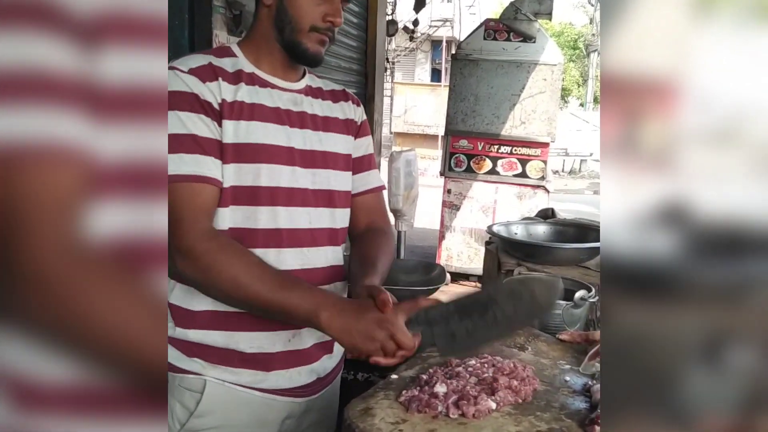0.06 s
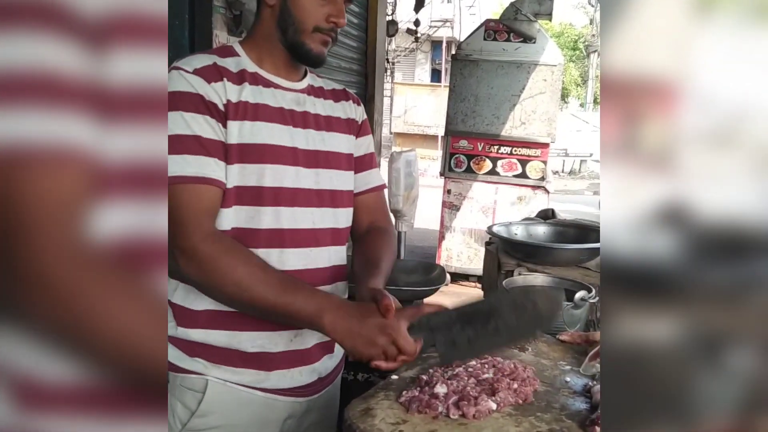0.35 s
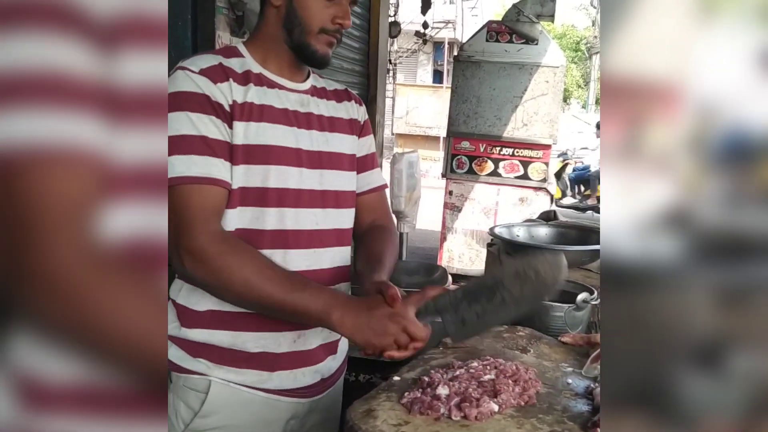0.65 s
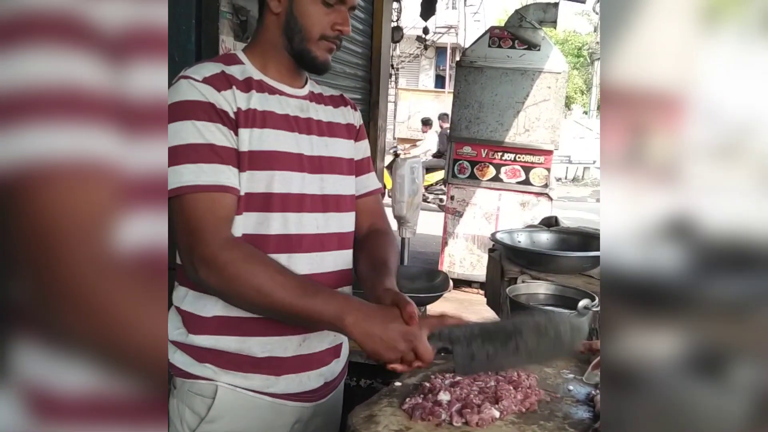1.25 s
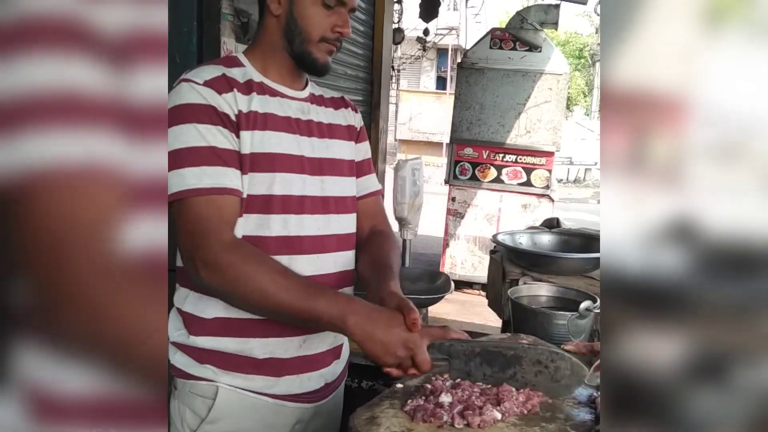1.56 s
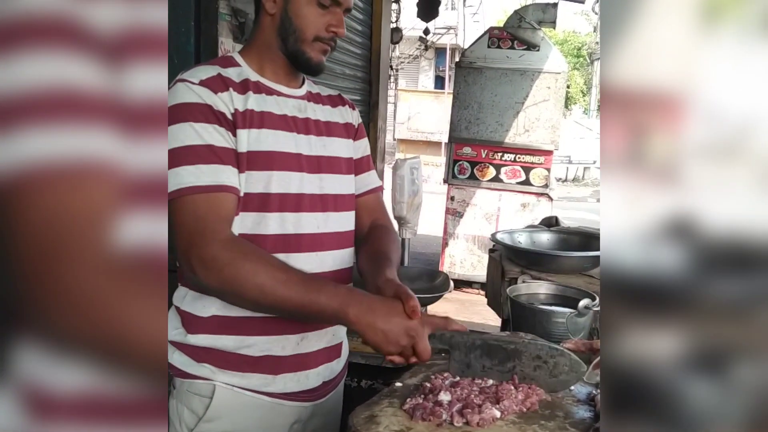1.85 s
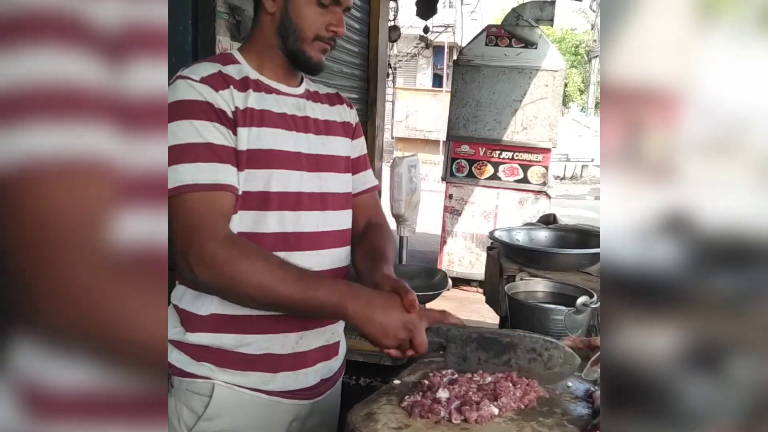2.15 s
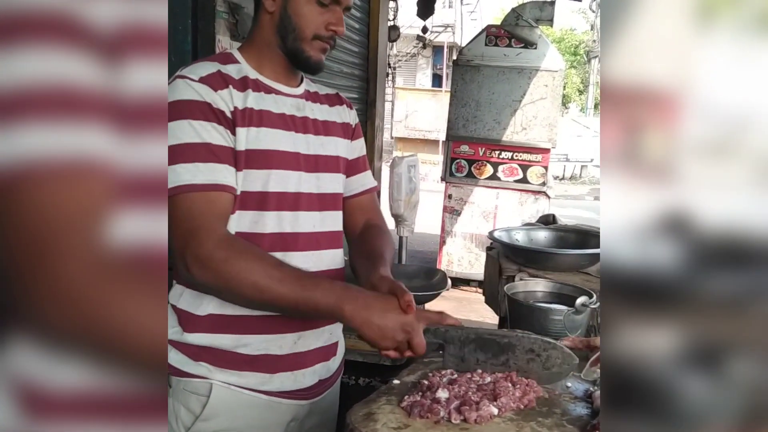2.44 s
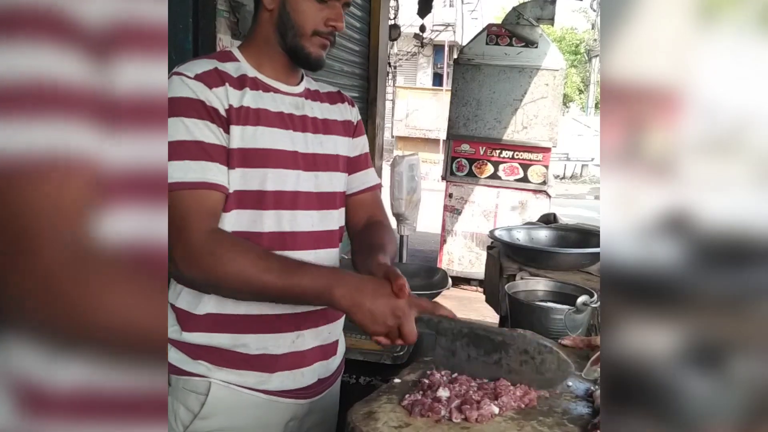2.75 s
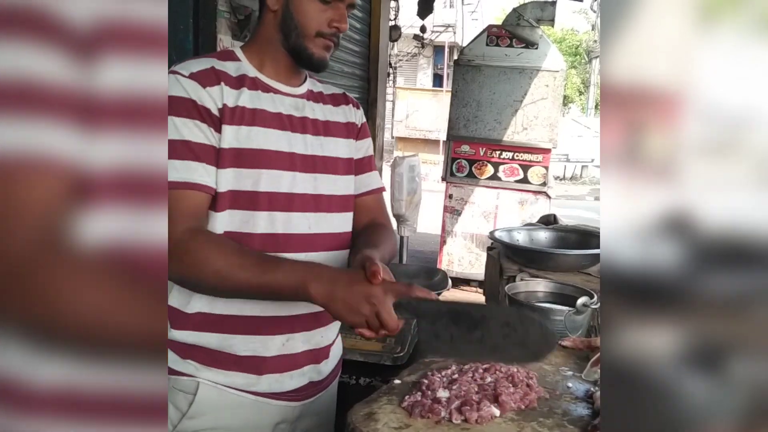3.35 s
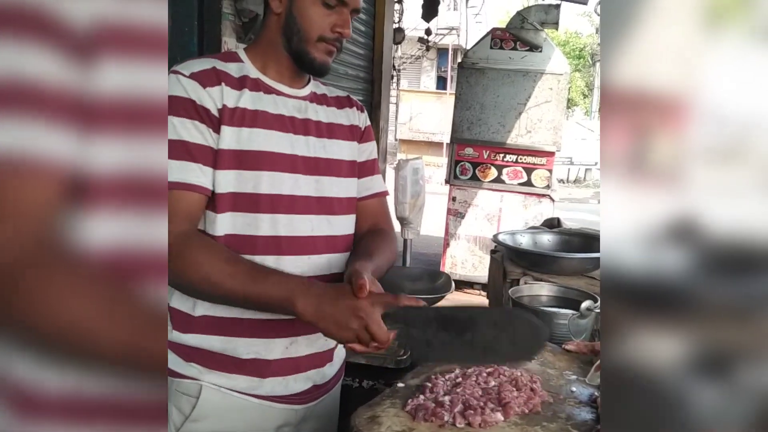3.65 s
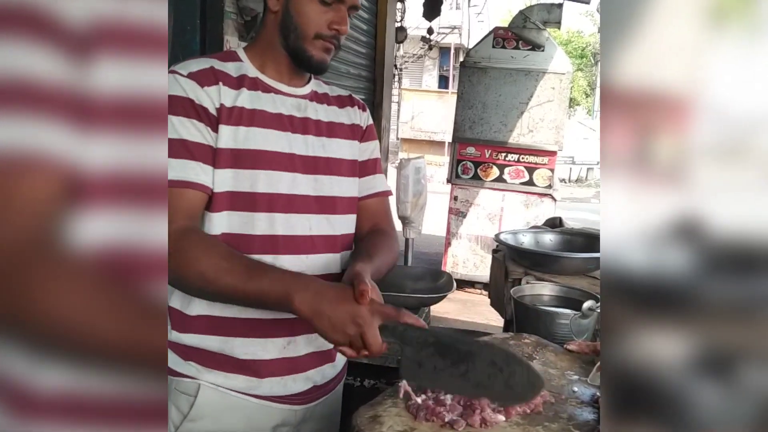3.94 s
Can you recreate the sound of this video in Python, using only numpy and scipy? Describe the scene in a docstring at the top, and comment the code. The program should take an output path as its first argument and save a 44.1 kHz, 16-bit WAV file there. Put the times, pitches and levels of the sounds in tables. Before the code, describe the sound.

A heavy cleaver chops meat steadily on a wooden block, with street traffic behind.

```python
"""Sharp chops over a puttering motorbike: a heavy cleaver minces meat, about 3.5 blows a second.
Each blow is a wet crack of meat, a short clank of the blade and a thud of the wooden block,
and it sets the small street stall ringing. Outside, traffic hums, the motorbike fades away,
metal scrapes and clinks, and brakes squeal. An automatic volume control dips after each blow."""
import sys
import numpy as np
from scipy import signal
from scipy.fft import rfft, irfft
from scipy.io import wavfile
from scipy.ndimage import uniform_filter1d, minimum_filter1d

SR = 44100
rng = np.random.default_rng(int(sys.argv[2]) if len(sys.argv) > 2 else 0)


def file_out(sig):
    """Save sig as 16-bit WAV at sys.argv[1]."""
    # one column per channel
    cols = np.atleast_2d(sig).T
    # limit, then scale
    lim = np.clip(cols, -1, 1)
    pcm = np.round(lim * 32767).astype(np.int16)
    wavfile.write(sys.argv[1], SR, pcm)


N = 176400
TIME = np.arange(N) / SR  # seconds since the scene began
AGE = TIME[:SR // 2]  # seconds since one short sound began

def amp(db):
    """Turn decibels into a number to multiply by."""
    return 10 ** (np.asarray(db) / 20)

def unit(x):
    """Scale a sound to an average (rms) size of 1."""
    return x / np.sqrt(np.mean(x ** 2))

def curve(rows, column=1):
    """Join one column of a table by straight lines in time."""
    rows = np.array(rows)
    return np.interp(TIME, rows[:, 0], rows[:, column])

def colour(x, tone):
    """Make pitches louder or softer, following rows of Hz and dB."""
    hz, db = np.array(tone).T
    freqs = np.maximum(np.arange(len(x) // 2 + 1) * SR / len(x), 1)
    gain = amp(np.interp(np.log(freqs), np.log(hz), db))
    bass_cut = np.minimum(freqs / hz[0], 1) ** 2
    return irfft(rfft(x) * gain * bass_cut, len(x))

def keep_side(x, side, hz, order=2):
    """Keep the "low" or the "high" side of a pitch."""
    return signal.sosfilt(signal.butter(order, hz, side, fs=SR, output="sos"), x)

def noise(tone, size=N):
    """Noise with the given tone and an average size of 1."""
    return unit(colour(rng.standard_normal(size), tone))

def drift(per_second):
    """A smooth random wander with an average size of 1."""
    step = int(SR / per_second)
    held = np.repeat(rng.standard_normal(N // step + 1), step)
    return unit(uniform_filter1d(uniform_filter1d(held, step), step)[:N])

def fade(ring_s):
    """Die away by 60 dB in ring_s seconds, the "ring time"."""
    return np.exp(-np.log(1000) * AGE / ring_s)

def rise(seconds):
    """Climb from silence towards full level."""
    return 1 - np.exp(-AGE / seconds)

def sine(hz):
    """A short, pure tone."""
    return np.sin(2 * np.pi * hz * AGE)

def through(x, response):
    """Play a sound through an object, given its response to one click."""
    return signal.fftconvolve(x, response)[:N]

def add(out, start_s, sound):
    """Mix a sound in at its start time."""
    i = int(start_s * SR)
    out[i:i + len(sound)] += sound[:max(N - i, 0)]

# The tone of far-off traffic. Each row: pitch in Hz, relative level in dB.
STREET_TONE = [(25, -23), (80, -2.5), (190, -6), (290, 1), (550, -11), (850, -4.5), (1500, -13),
               (3500, -14.5), (7000, -39), (15500, -39)]
STREET_DB, STREET_SWELL_DB = -61, 3

def street():
    """Distant traffic hums and swells gently."""
    return noise(STREET_TONE) * amp(STREET_DB + STREET_SWELL_DB * drift(5))

# The motorbike going by. Each row: time in seconds, level in dB.
BIKE_LEVEL = [(0, -45), (.42, -39.5), (.56, -64.5), (.95, -58.5), (1.2, -49.5), (1.33, -63), (1.55, -53.5),
              (1.75, -61.5), (4, -89)]
# The exhaust pipe's notes. Each row: pitch in Hz, relative level in dB, ring time in seconds.
EXHAUST_NOTES = [(739, -9, 0.11), (990, 6.5, 0.063), (1059, -6, 0.12), (1455, -11.5, 0.068),
                 (1730, -6.5, 0.036), (2970, -15, 0.037)]
FIRING_HZ, FIRST_FIRING_S, FIRING_JITTER = 48.6, .004, .03
FIRING_SCATTER_DB, WEAK_FIRING_DB, GAS_DB, BIKE_SURGE_DB = 2.5, -6, -10, 3.5

def motorbike():
    """Strong and weak firings take turns ringing the exhaust, each with a puff of gas."""
    firings = np.zeros(N)
    for k, (late, strength) in enumerate(rng.standard_normal((N // 800, 2))):
        start = FIRST_FIRING_S + (k + FIRING_JITTER * late) / FIRING_HZ
        add(firings, start, amp([FIRING_SCATTER_DB * strength + WEAK_FIRING_DB * (k % 2)]))
    gas = through(firings, fade(ring_s=.04)) * rng.standard_normal(N)
    pipe = sum(amp(db) * fade(ring_s) * sine(hz) for hz, db, ring_s in EXHAUST_NOTES) * rise(0.0035)
    putter = through(unit(firings) + amp(GAS_DB) * unit(gas), pipe)
    return unit(putter) * amp(curve(BIKE_LEVEL) + BIKE_SURGE_DB * drift(24.22))

def metal_note(hz, size, waver=.016):
    """One note of rubbing metal: a fast tremble around a steady pitch makes it rasp."""
    step = 25  # samples between random turns
    turns = rng.standard_normal(size // step + 2)
    tremble = np.interp(np.arange(size) / step, np.arange(len(turns)), turns)
    return np.sin(2 * np.pi * np.cumsum(hz * (1 + waver * tremble)) / SR)

def squeak(hz, length_s):
    """A rasping note that swells and dies."""
    size = int(length_s * SR)
    return np.hanning(size) * metal_note(hz, size)

# The hiss of passing traffic. Each row: time in seconds, level in dB.
TRAFFIC_HISS_LEVEL = [(.1, -53), (.4, -60), (.68, -53), (1.05, -62.5), (1.28, -55), (1.45, -64),
                      (2.2, -73.5), (2.62, -66), (2.9, -79)]
# The tone of that hiss. Each row: pitch in Hz, relative level in dB.
HISS_TONE = [(1500, -15), (3200, -6), (5000, 5.5), (6700, 7), (8000, -2), (11000, -13), (15500, -22.5)]
SCRAPES_PER_S, SCRAPE_S, SCRAPE_SCATTER_DB, SMOOTH_HISS_DB = 480, .045, 4, -4

def traffic_hiss():
    """A raspy screech from the street: a swarm of tiny squeaks over smooth noise."""
    swarm = np.zeros(N)
    pitches = np.linspace(2600, 10500, 36) + rng.uniform(-90, 90, 36)
    for when, pick, length in rng.random((int(SCRAPES_PER_S * N / SR), 3)):
        scrape = squeak(pitches[int(pick * len(pitches))], SCRAPE_S * (.5 + length))
        add(swarm, when * N / SR, amp(SCRAPE_SCATTER_DB * rng.standard_normal()) * scrape)
    hiss = unit(colour(swarm, HISS_TONE)) + amp(SMOOTH_HISS_DB) * noise(HISS_TONE)
    return unit(hiss) * amp(curve(TRAFFIC_HISS_LEVEL))

# Brief squeaks of metal. Each row: start in seconds, length in seconds, pitch in Hz, level in dB.
METAL_SQUEAKS = [(0, 0.2, 4120, -53.5), (.17, .11, 2700, -46), (.29, 0.19, 3720, -58),
                 (.55, 0.23, 4820, -55.5)]
# Clinks of loose metal. Each row: start in seconds, strongest pitch in Hz, its level in dB.
METAL_CLINKS = [(1.474, 5150, -48), (1.541, 5240, -53), (1.806, 7220, -52.5), (1.869, 7370, -51.5),
                (2.059, 5130, -55), (2.435, 6320, -47.5), (2.627, 5090, -54)]
CLINK_RANGE_HZ, CLINK_OTHERS_DB = (4300, 8800), -13

def loose_metal():
    """Metal squeaks and clinks in the street; each clink has seven softer notes of its own."""
    out = np.zeros(N)
    for start, length, hz, db in METAL_SQUEAKS:
        add(out, start, amp(db) * squeak(hz, length))
    for start, hz, db in METAL_CLINKS:
        others = sum(metal_note(pitch, len(AGE)) for pitch in rng.uniform(*CLINK_RANGE_HZ, size=7))
        ring = metal_note(hz, len(AGE)) + amp(CLINK_OTHERS_DB) * others
        add(out, start, amp(db) * ring * fade(ring_s=0.12) * rise(0.0016))
    return out

# The tone of the stall's echo. Each row: pitch in Hz, level change in dB.
ECHO_TONE = [(160, -2), (260, 2.5), (450, -1.5), (630, -2.5), (800, -6), (1050, -4.5), (1270, -7),
             (1850, 0), (2250, -6), (2600, 2), (4000, -3.5), (8000, -14), (12000, -29.5)]

def stall_echo():
    """Many reflections in the stall blur into one tail; the treble dies first."""
    reflections = rng.standard_normal(len(AGE))
    low = keep_side(reflections, "low", hz=2500) * fade(ring_s=.26)
    high = keep_side(reflections, "high", hz=2500) * fade(ring_s=.2)
    tail = (low + high) * rise(0.0031)
    soft_end = np.minimum(2 * (1 - AGE / AGE[-1]), 1) ** 2
    return colour(tail / np.sqrt(np.sum(tail ** 2)), ECHO_TONE) * soft_end

# Brake squeals, one list for each. Each row: time in seconds, pitch in Hz, level in dB.
BRAKE_SQUEALS = [
    [(.86, 3230, -89), (.9, 3240, -51), (.99, 3320, -77), (1.2, 3270, -48), (1.4, 3245, -58.5),
     (1.5, 3240, -45), (1.61, 3236, -49.5), (1.72, 3180, -72)],
    [(1.98, 2960, -61.5), (2.15, 2840, -57.5), (2.33, 2940, -59.5), (2.45, 2980, -49), (2.65, 2985, -46.5),
     (3.12, 3002, -46), (3.22, 3020, -41), (3.4, 3030, -49), (3.59, 3033, -50), (3.76, 2895, -65)],
]
SQUEAL_WAVER, SQUEAL_FLUTTER_DB, SQUEAL_ECHO_DB = .002, 1.5, -9
RASP_DB, RASP_WIDTH_HZ = -7, 109.5

def brakes():
    """Thin squeals echo into the stall; uneven friction makes them rasp."""
    out = np.zeros(N)
    for rows in BRAKE_SQUEALS:
        hz = curve(rows) * (1 + SQUEAL_WAVER * drift(120))
        phase = 2 * np.pi * np.cumsum(hz) / SR
        rasp = drift(2 * RASP_WIDTH_HZ) * np.sin(phase) + drift(2 * RASP_WIDTH_HZ) * np.cos(phase)
        db = curve(rows, column=2) + SQUEAL_FLUTTER_DB * drift(48)
        sounding = (TIME > rows[0][0]) & (TIME < rows[-1][0])
        out += amp(db) * (np.sin(phase) + amp(RASP_DB) * rasp) * sounding
    return out + amp(SQUEAL_ECHO_DB) * through(out, stall_echo())

# The notes of the stall and its stand. Each row: pitch in Hz, gain in dB, ring time in seconds.
STALL_NOTES = [(286, -2, 0.46), (356.3, -0.5, 0.21), (385, 4.5, 0.12), (430, 7.5, 0.084), (498, 1, 0.26),
               (672, -8, 0.38), (821, -12, .16), (996, -8, 0.13), (1805, 0, 0.11)]

def stall(x):
    """A sound arrives directly, echoes and sets the stall ringing."""
    response = stall_echo()
    for hz, db, ring_s in STALL_NOTES:
        gain = amp(db) * 2 * np.log(1000) / (ring_s * SR)  # offsets the build-up of a long ring
        response += gain * fade(ring_s) * np.cos(2 * np.pi * hz * AGE)
    return x + through(x, response)

def damped_note(hz, swell_s):
    """A note that peaks after swell_s seconds and dies within a few swings."""
    progress = AGE / swell_s
    return (progress * np.exp(1 - progress)) ** 2.73 * sine(hz)

# The notes of the bending blade. Each row: pitch in Hz, relative level in dB, ring time in seconds.
BLADE_NOTES = [(2530, -6.5, 0.12), (2685, -8, 0.11), (3814, -3.5, 0.1), (4860, -20, 0.088),
               (6000, -14.5, 0.15), (6700, -24, 0.15)]

def blade_ring(scatter_db=4, pitch_scatter=0.006):
    """The steel rings briefly; every spot on the edge favours different notes."""
    ring = np.zeros(len(AGE))
    for hz, db, ring_s in BLADE_NOTES:
        level = amp(db + scatter_db * rng.standard_normal())
        ring += level * fade(ring_s) * sine(hz * (1 + pitch_scatter * rng.standard_normal()))
    return ring

# The tones of the meat's crack and its wet splat. Each row: pitch in Hz, relative level in dB.
CRACK_TONE = [(500, 13.5), (1200, 8.5), (2200, 4.5), (2600, 5), (3200, -1), (3800, -12), (6000, -35)]
SPLAT_TONE = [(3000, -6.5), (4600, 6), (7500, -3.5), (9500, -24.5), (15500, -44)]
CRACK_DECAY_S, SPLAT_DECAY_S = 0.0088, 0.0043

def meat(crack_db, splat_db):
    """The edge cuts wet meat with a crack and a shorter, brighter splat."""
    crack = amp(crack_db) * noise(CRACK_TONE, len(AGE)) * np.exp(-AGE / CRACK_DECAY_S)
    splat = amp(splat_db) * noise(SPLAT_TONE, len(AGE)) * np.exp(-AGE / SPLAT_DECAY_S)
    return crack + splat

def wood(notes, pitch_scatter=0.05):
    """The wood's notes differ a little at every spot; a filter like a microphone's thins the bass."""
    sound = np.zeros(len(AGE))
    for hz, db, swell_s in notes:
        sound += amp(db) * damped_note(hz * (1 + pitch_scatter * rng.standard_normal()), swell_s)
    return keep_side(sound, "high", hz=177.6, order=6)

# The block's higher notes. Each row: pitch in Hz, relative level in dB, seconds to full swing.
KNOCK_NOTES = [(804.5, -5.5, 0.0045), (1038, -7, 0.0036), (1443, -17.5, 0.0049)]
THUD_SWELL_S, OVERTONE_RATIO, OVERTONE_DB = 0.0047, 1.2, -4.5

def block(thud_hz, thud_db, knock_db):
    """The struck block thuds with its two lowest notes and knocks with its higher ones."""
    lowest = (thud_hz, 0, THUD_SWELL_S)
    overtone = (thud_hz * OVERTONE_RATIO, OVERTONE_DB, THUD_SWELL_S / OVERTONE_RATIO)
    return amp(thud_db) * wood([lowest, overtone]) + amp(knock_db) * wood(KNOCK_NOTES)

# The tone of the shaking block. Each row: pitch in Hz, relative level in dB.
JUDDER_TONE = [(170, -24.5), (250, -0.5), (480, 2.5), (620, -8), (820, -0.5), (1100, -14), (1400, -18),
               (2200, -19), (4000, -51.5)]

def judder(swell_s=0.015):
    """The block shakes on its stand after a blow."""
    progress = AGE / swell_s
    return noise(JUDDER_TONE, len(AGE)) * progress * np.exp(1 - progress)

# The cleaver's blows. Each row: start in seconds, thud level in dB, thud pitch in Hz, then the levels
# in dB of the knock, clank, crack, splat and steel ring. The gains below are added to these levels.
BLOWS = [(0.1512, -39, 320, -34.5, -27, -29, -38, -35), (0.4474, -34, 339.6, -31, -31, -34, -45, -46),
         (0.7445, -37.5, 350, -36.5, -30, -30.5, -40, -29), (1.03, -34.5, 338, -33.5, -33, -40, -52, -43),
         (1.32, -37.5, 338, -31.5, -22, -33, -45, -36), (1.6027, -36, 337, -37.5, -28, -41, -47.5, -45.5),
         (1.8921, -37, 345, -39.5, -28, -29, -63, -43.5), (2.173, -38, 346, -33, -20.5, -31.5, -65, -45),
         (2.457, -30.5, 345, -32, -30, -26, -39.5, -38), (2.7388, -36, 343, -34, -28.5, -35, -43, -34),
         (3.0202, -32.5, 337.3, -33, -27, -29.5, -44, -36.5),
         (3.3132, -37, 333, -33.5, -40.5, -34.5, -45.5, -31.5),
         (3.6057, -37.5, 357, -40, -41, -35.5, -47.5, -41), (3.8924, -39, 312, -37, -38, -35.5, -40, -35)]
THUD_DB, KNOCK_DB, CLANK_DB, CRACK_DB, SPLAT_DB, RING_DB, JUDDER_DB = 10.5, 15.5, 10, 6, 6, -9, -1.5
BLOCK_LAG_S = 0.00198  # the edge reaches the wood after the meat
COUNTER_ECHO_S, COUNTER_ECHO_DB = 0.00363, -12.5  # the thud bounces off the counter
WALL_ECHO_S, WALL_ECHO_DB = .026, -13.5  # and flutters between two walls

def cleaver():
    """The edge cracks through wet meat, the blade clanks and the block thuds."""
    cuts, thuds = np.zeros(N), np.zeros(N)
    for start, thud_db, thud_hz, knock_db, clank_db, crack_db, splat_db, ring_db in BLOWS:
        clank = amp(clank_db + CLANK_DB) * damped_note(hz=1856, swell_s=0.0018)
        ring = amp(ring_db + RING_DB) * blade_ring()
        wet_crack = meat(crack_db + CRACK_DB, splat_db + SPLAT_DB)
        add(cuts, start, (clank + ring + wet_crack) * rise(0.00016))
        thud = block(thud_hz, thud_db + THUD_DB, knock_db + KNOCK_DB)
        landing = start + BLOCK_LAG_S
        add(thuds, landing, thud)
        add(thuds, landing + COUNTER_ECHO_S, amp(COUNTER_ECHO_DB) * thud)
        for bounce in (1, 2):
            add(thuds, landing + bounce * WALL_ECHO_S, amp(bounce * WALL_ECHO_DB) * thud)
        add(thuds, start, amp(thud_db + JUDDER_DB) * judder())
    return thuds + keep_side(cuts, "high", hz=400)

def scene():
    """The chopping in its stall with the street outside, in one channel."""
    return (stall(cleaver()) + motorbike() + street() + brakes() + traffic_hiss() + loose_metal())[None]

DIP_ABOVE_DB, DIP_RATIO, DIP_HOLD_S, DIP_RECOVER_S = -21, 1.454, 0.013, 0.14
TREBLE_LIMIT_HZ = 15600

def record(dry):
    """The volume dips on each blow, holds and recovers; the highest treble is cut."""
    peak = -minimum_filter1d(-np.abs(dry[0]), SR // 250)  # the biggest swing nearby
    peak = uniform_filter1d(peak, SR // 500)
    half_hold = int(DIP_HOLD_S * SR / 2)
    held = -minimum_filter1d(-peak, 2 * half_hold + 1, origin=half_hold)
    log_level = np.log(np.maximum(held, amp(DIP_ABOVE_DB)))
    recovery = TIME / DIP_RECOVER_S
    level = np.exp(np.maximum.accumulate(log_level + recovery) - recovery)  # jumps up, sinks slowly
    gain = (amp(DIP_ABOVE_DB) / level) ** (1 - 1 / DIP_RATIO)
    treble_cut = signal.ellip(10, .2, 70, TREBLE_LIMIT_HZ, fs=SR, output="sos")
    return signal.sosfilt(treble_cut, dry * gain)

dry = scene()
out = record(dry)
file_out(out)
```